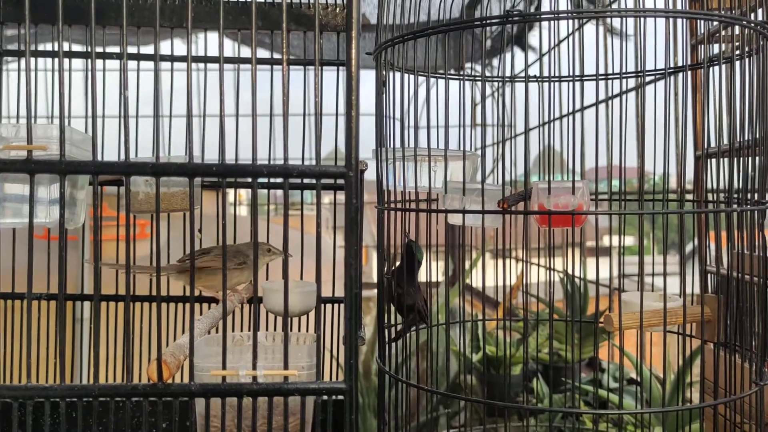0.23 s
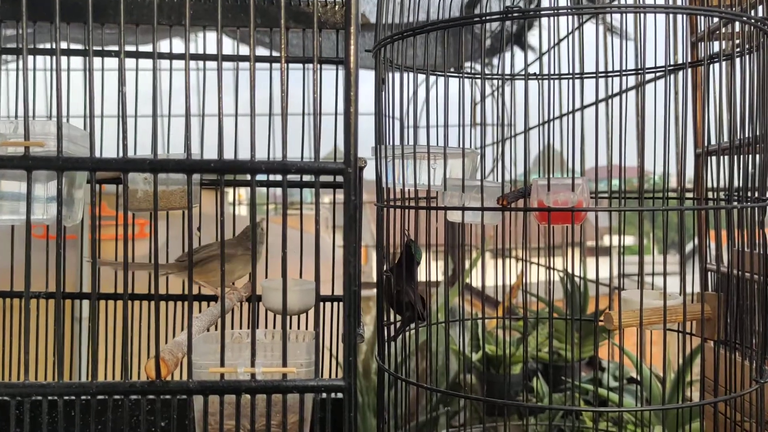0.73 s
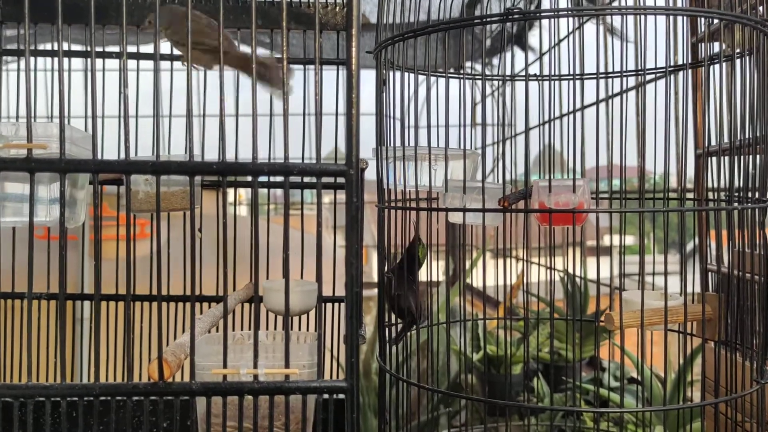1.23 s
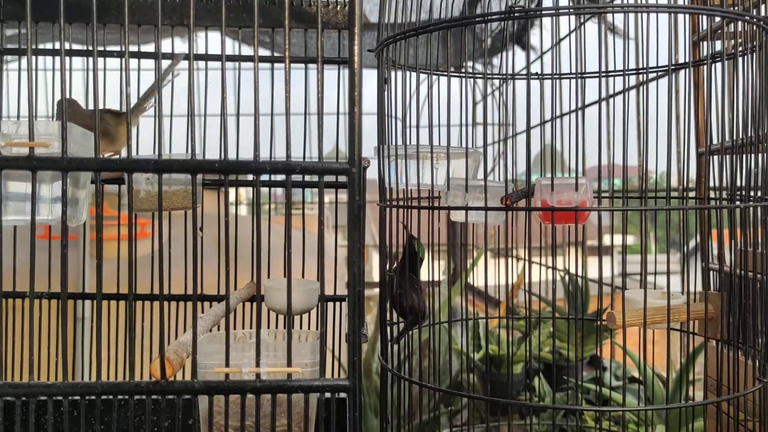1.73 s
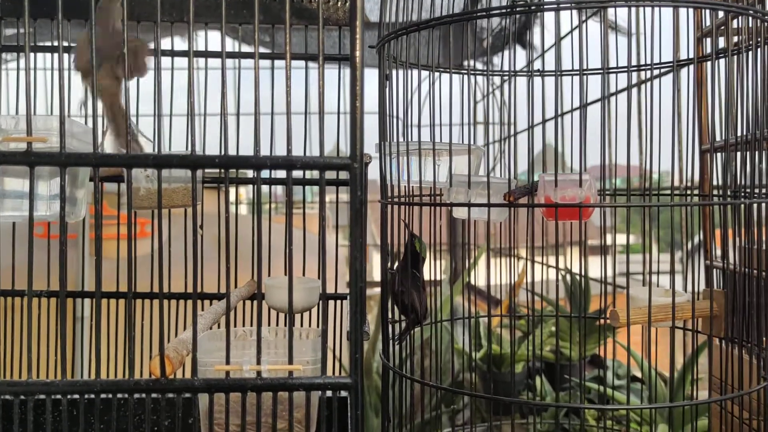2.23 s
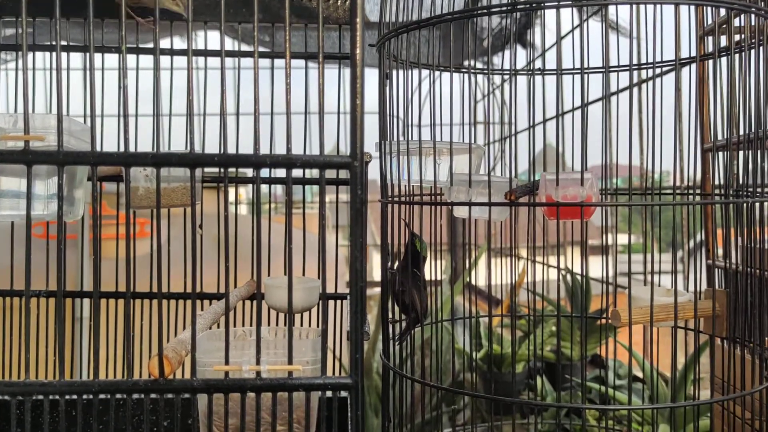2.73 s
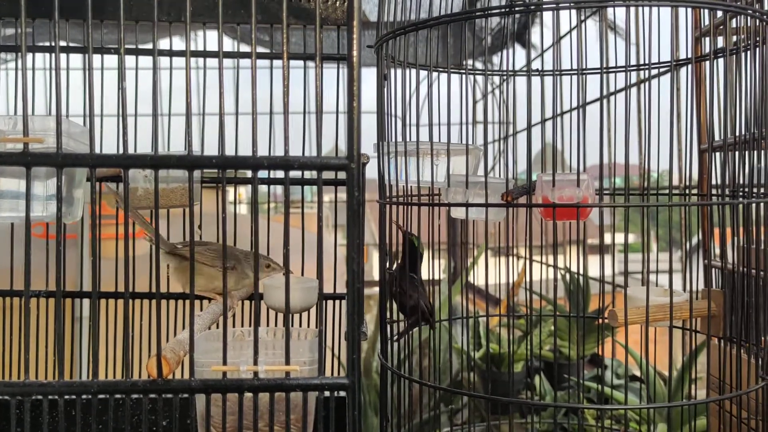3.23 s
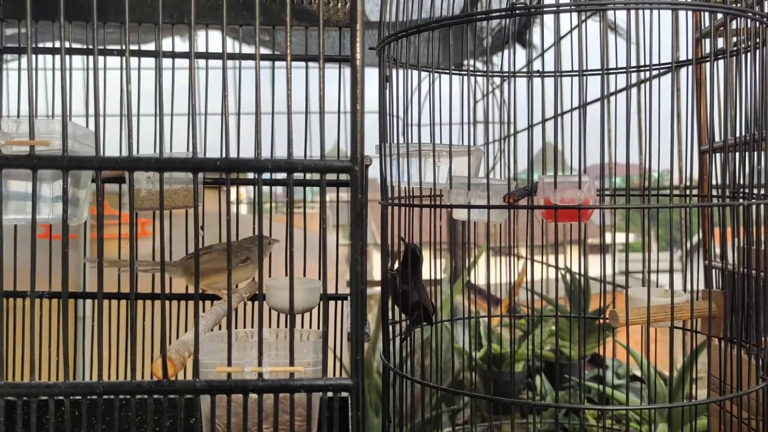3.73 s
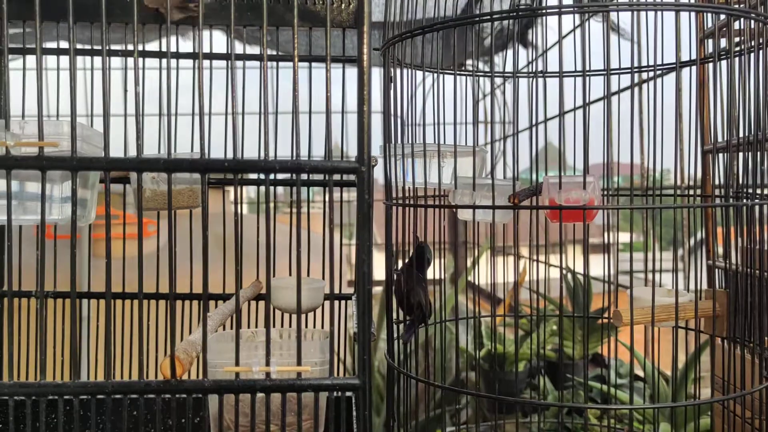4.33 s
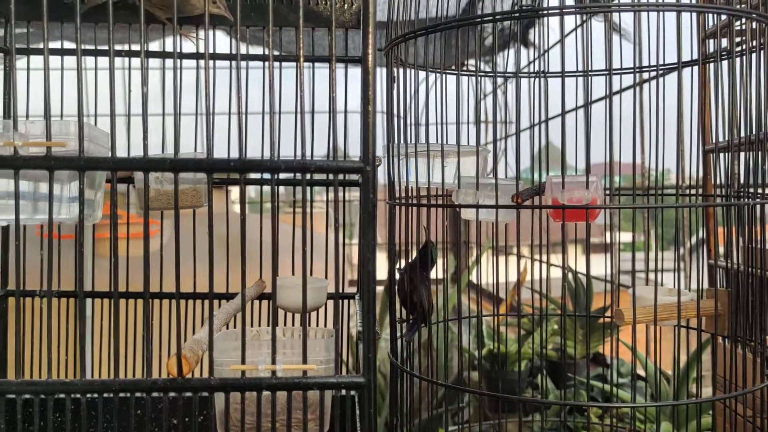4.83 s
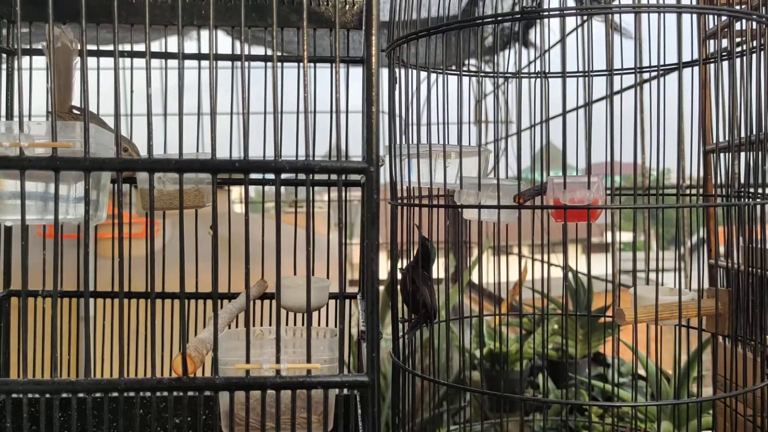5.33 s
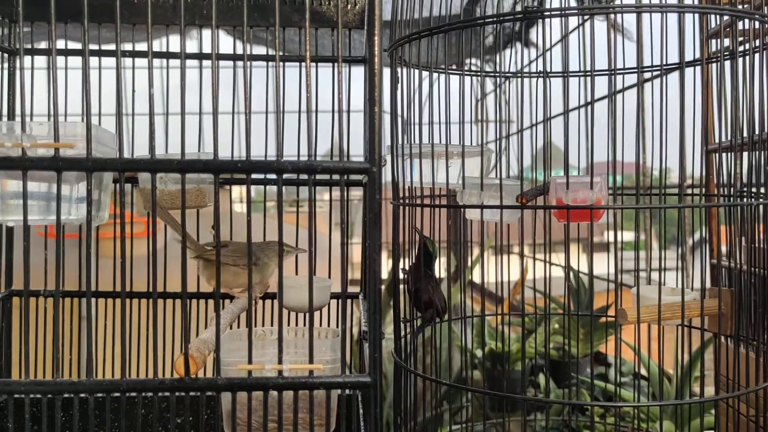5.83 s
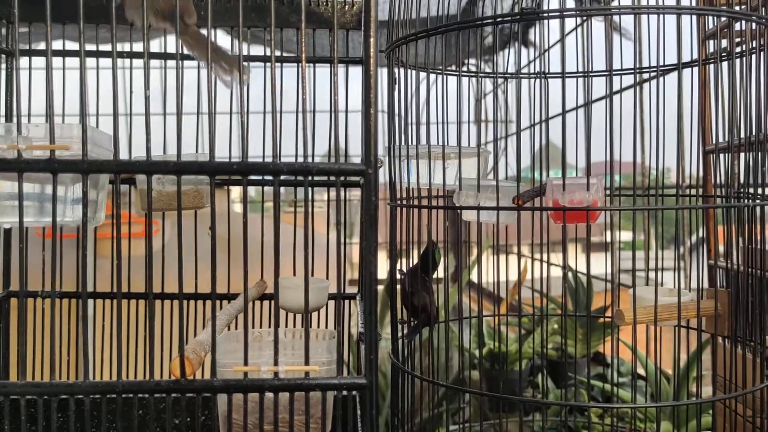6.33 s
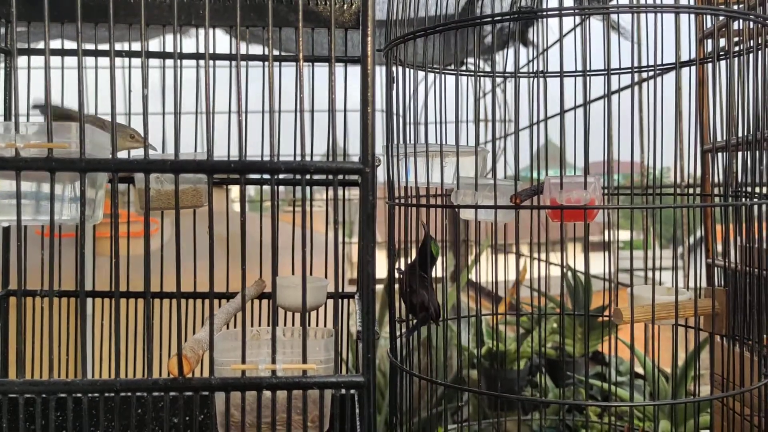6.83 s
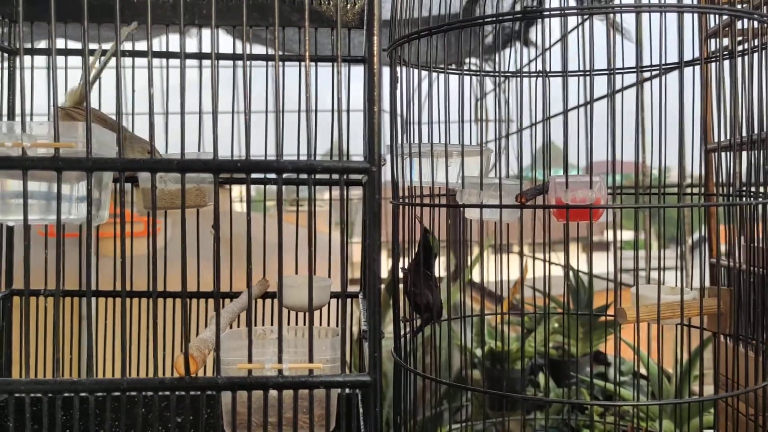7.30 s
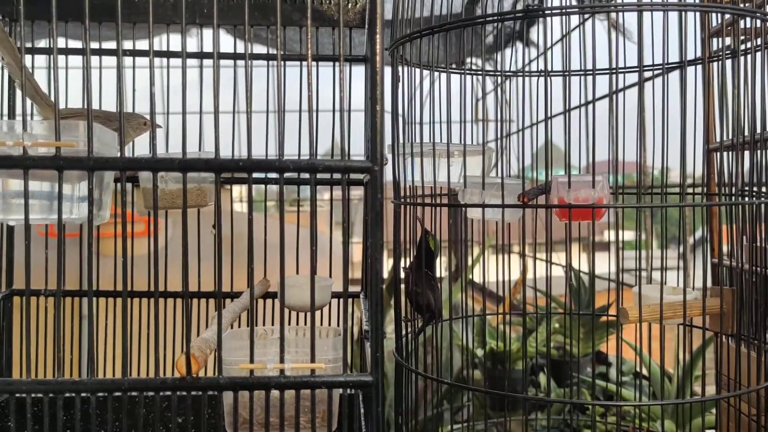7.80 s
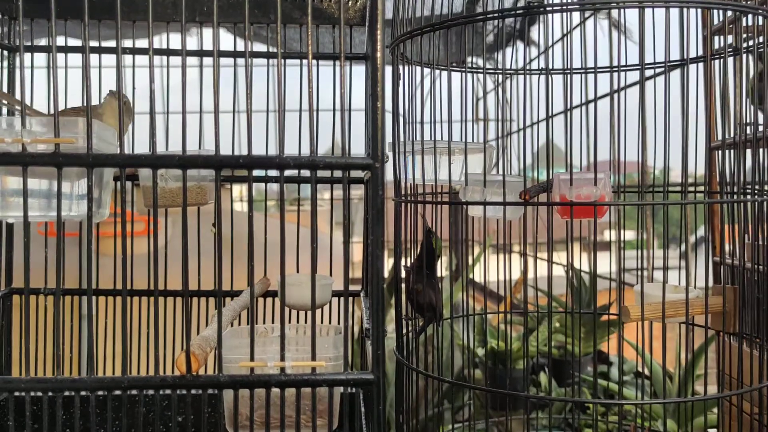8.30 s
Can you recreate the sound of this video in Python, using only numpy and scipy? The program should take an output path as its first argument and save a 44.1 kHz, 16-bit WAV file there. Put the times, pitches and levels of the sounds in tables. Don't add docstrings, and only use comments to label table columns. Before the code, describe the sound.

Sharp falling chips, buzzy rapid chirps, rough chacks and arched whistles from caged birds hopping on bars, with soft town rumble behind.

```python
import sys
import numpy as np
from scipy import signal
from scipy.fft import rfft, irfft
from scipy.io import wavfile
from scipy.ndimage import uniform_filter1d

SR = 44100
rng = np.random.default_rng(int(sys.argv[2]) if len(sys.argv) > 2 else 0)


def amplitude_ratio(level_db):
    exponent = np.asarray(level_db, float) / 20
    return 10 ** exponent


def to_wav(s):
    ch = np.atleast_2d(s).T
    pcm = np.round(np.clip(ch, -1, 1) * 32767)
    wavfile.write(sys.argv[1], SR, pcm.astype(np.int16))


N = 377496

# frequency_hz, density_db
HUM_SPECTRUM = [(15, -37), (25, -3), (55, 2), (84, -3.5), (212, -8), (439, -20.5), (659, -19.5),
                (1370, -34.5), (2760, -29.5), (4030, -33), (4740, -21.5), (7920, -44.5), (10100, -49.5),
                (14000, -38.5), (16000, -51.5)]
# time_s, level_db
MOTOR_LEVEL = [(0.0, -54.5), (0.71, -51), (1.02, -50), (1.55, -48.5), (2.2, -57.5), (5.6, -58),
               (6.32, -54.5), (8.56, -56.5)]
# frequency_hz, density_db
FEATHER_SPECTRUM = [(590, -60), (1000, -22), (2330, -10.5), (2650, -4.5), (3460, -7.5), (4730, 0),
                    (5310, -2), (10400, -15), (14100, 3), (15100, -4.5), (16000, -26)]
# start_s, length_s, level_db, change_db
FLURRIES = [(0.0, 0.078, -58, 6.5), (0.204, 0.14, -55, 5.5), (1.303, 0.15, -68, 0),
            (1.503, 0.027, -62, -12), (1.83, 0.38, -66, -11), (2.185, 0.22, -56, -16),
            (2.423, 0.38, -69.5, 11.5), (2.97, 0.17, -55, 2), (3.315, 0.27, -51.5, -12),
            (4.028, 0.3, -53.5, 0), (4.49, 0.096, -58.5, -7), (4.857, 0.27, -59, -6.5),
            (5.42, 0.16, -69.5, 14.5), (5.622, 0.079, -67, -3), (5.868, .1, -76, 14), (6.29, 0.09, -65, 11),
            (6.45, 0.56, -72.5, 15), (7.491, 0.33, -55.5, -10.5), (8.079, 0.21, -52, -3.5),
            (8.452, .04, -83, -0.5)]
# frequency_hz, level_db, t60_s
BAR_MODES = [(1692, -5.5, 0.049), (3126, -10, 0.11), (4660, 1, 0.034), (5910, 9.5, 0.028),
             (7340, -37, 0.015), (9230, -0.5, 0.013), (12930, 10.5, 0.011), (13100, 3, 0.012)]
# time_s, peak_db, middle_against_treble_db
LANDINGS = [(.072, -47.5, 21), (.313, -44, 21), (1.495, -26, 7), (1.734, -38, 5), (1.8317, -31.5, 5.5),
            (1.8447, -27, -1), (1.8961, -31, -21), (2.2130, -33, -10), (2.2450, -41, -12),
            (2.2827, -34, -1), (2.329, -36, -2), (2.367, -31, 5.5), (2.3995, -36, 9.5), (3.0495, -32, -5),
            (3.0956, -28.5, 9.5), (4.4932, -40, 9), (4.525, -29.5, 4.5), (4.5386, -29.5, 2),
            (4.6339, -34, -2), (4.6813, -55, 19.5), (4.719, -52, 16), (4.906, -35, 6), (5.041, -29.5, 4.5),
            (5.5897, -27, 1), (5.7274, -36, 4), (7.0008, -38.5, 6), (7.105, -34, -2), (8.079, -40, 4.5),
            (8.112, -40, 6), (8.1535, -31.5, 7.5), (8.183, -31, 8.5), (8.1945, -29, 8), (8.21, -36, 6.5),
            (8.254, -33, -9)]
# time_s, peak_db
GRIPS = [(.078, -41), (1.056, -35.5), (2.6836, -38), (2.738, -37), (2.968, -40), (5.5667, -57),
         (5.687, -36), (5.885, -41), (6.7126, -42), (6.7391, -43), (8.0994, -38), (8.469, -45.5)]

# frequency_hz, coherence_0_to_1
PORT_COHERENCE = [(60, 1), (130, .95), (290, 0.78), (600, 0.35), (1400, 0.4), (3100, 0.4), (6800, 0.3),
                  (15000, 0.3)]
# frequency_hz, level_db
LEFT_LEVEL = [(200, -0.5), (1300, 0.2), (2400, 0.5), (3800, -4), (4700, -8), (5600, -9), (7000, -5),
              (9000, -2.5), (14000, -13)]
# frequency_hz, lead_rad
LEFT_LEAD = [(60, -0.1), (200, -0.4), (430, -0.9), (1300, -3), (2500, -5.5), (4400, -6), (5400, -8),
             (6500, -7.5), (7500, -8), (10000, -7.5), (15000, -12)]
# frequency_hz, width_hz, gain_db
RIGHT_PORT_MODES = [(4850, 840, 7), (13800, 2100, 9.5)]
# delay_ms, left_db, right_db
EARLY_ECHOES = [(.9, -42.5, -35), (2.3, -32, -4), (4.1, -14.5, -15), (6.6, -8.5, -13.5),
                (13.5, -12.5, -15.5), (19, -17.5, -27)]
# frequency_hz, t60_s
TERRACE_DECAY = [(1000, 0.21), (4000, .11), (8000, 0.11), (15000, 0.16)]
# frequency_hz, threshold_db
MASKING_THRESHOLD = [(800, -90), (1100, -41), (1650, -43), (2300, -56), (7000, -54), (8400, -41),
                     (11300, -43), (12200, -75), (16000, -75)]

# start_s, end_s, first_hz, last_hz, level_db
BUZZES = [
    (4.028, 4.226, 6860, 6420, -43.5),
    (4.213, 4.441, 6380, 6194, -46.5),
]
# start_s, end_s, first_hz, last_hz, level_db
WHISTLES = [(.415, .50, 2830, 2770, -54.5), (.49, .60, 2790, 2800, -47.5), (.60, .72, 2580, 2430, -56),
            (4.30, 4.41, 2990, 2880, -41.5), (4.39, 4.53, 2740, 2625, -44.5),
            (4.675, 4.73, 2890, 2850, -59.5), (4.755, 4.80, 2610, 2780, -51.5),
            (4.77, 4.83, 3030, 2890, -54), (4.855, 4.915, 2868, 2796, -45), (4.94, 5.08, 2684, 2616, -47),
            (7.215, 7.34, 2940, 2933, -47.5), (7.36, 7.5, 2970, 2900, -64)]
# start_s, end_s, first_hz, last_hz, level_db
FAINT_WHISTLES = [(1.38, 1.44, 4730, 4750, -57.5), (2.525, 2.595, 4450, 4190, -56.5),
                  (2.62, 2.675, 3700, 4300, -60), (2.675, 2.71, 4150, 4100, -60), (2.855, 2.94, 4300, 4060, -61),
                  (2.82, 2.94, 5600, 5500, -69), (4.82, 4.86, 5150, 5220, -62),
                  (4.96, 5.09, 7100, 6950, -55), (5.117, 5.218, 6560, 6430, -54), (5.281, 5.434, 8480, 7540, -62),
         (5.801, 5.888, 6800, 7050, -65), (0.071, 0.085, 1440, 1370, -51), (4.537, 4.62, 784, 823, -60.5),
         (4.645, 4.68, 1990, 1950, -63), (5.5, 5.526, 6380, 5300, -56.5)]

# time_ms, level_db, pitch_hz
ARCH = [(-2, -27.5, 6900), (1, -16, 4600), (9, -3, 6800), (17.5, -2.5, 7250), (34.5, -6.5, 7950),
        (53, -5, 8100), (65.5, 5, 6600), (76, -3.5, 5405), (79, -46, 4330)]
POINTED_ARCH = [(-1.5, -14, 4900), (3.5, -9, 5500), (13, 2, 6800), (46.5, -8, 8370), (58.5, 8.5, 6800),
                (72.5, -2.5, 5010), (75, -38, 3900)]
SLUR = [(-3, -30, 5700), (0, -5, 5600), (9, -9, 5000), (16.5, 4, 4750), (23, -10, 4650), (45.5, -9, 4700),
        (61.5, -20, 2800), (69, -36, 4700)]
CHIP = [(-5.5, -34, 5600), (0.5, -8, 5800), (6, -4.5, 5550), (12, 2.5, 5000), (19, 0.5, 4400),
        (22, -7, 3400), (30.5, -9.5, 2500), (34, -26, 1150)]
FAR_CHIP = [(-6, -25, 5600), (2, 0, 5700), (6.5, -3.5, 5400), (14.5, 2.5, 4900), (18.5, -1, 4400),
            (25, -14, 3300), (25, -30, 3000)]
# time_ms, level_db, low_pitch_hz, high_pitch_hz
CHIRP = [(-8, -15, 2800, 4700), (3, -9, 3200, 4800), (10, -0.5, 3950, 5750), (16, -0.5, 4080, 5850),
         (24.5, -2.5, 3800, 5800), (36, 2, 3400, 5450), (45.5, 1, 3050, 4800), (54, 2.5, 2634, 4350),
         (61, -11, 2200, 4500)]
# attack_ms, hold_ms, release_ms, sag_db, first_hz, top_hz, rest_hz, sink_ms
CHACK = (16, 32.5, 34.5, -3.5, 1153.5, 1599, 559, 31.5)
TIK = (2.25, 9.3, 1.8, 1.5, 3700, 4160, 2250, 9.8)
SQUAWK = (6.5, 30.5, 24, -14, 864, 904.5, 638, 53)

# frequency_hz, gain_db
CHACK_THROAT = [(1500, -27), (2500, -25), (3100, -5.5), (4500, -1.5), (5600, -5), (6500, -13.5),
                (7500, -37.5)]
SQUAWK_THROAT = [(800, -48), (1500, 1.5), (2200, -7.5), (3000, -10), (3700, -6), (4500, -14), (6000, -30)]
CHIRP_THROAT = [(1500, -47), (2800, -6.5), (4000, -3.5), (5500, -1), (7000, 1.5), (8300, -20.5),
                (11000, -33)]
BEAK_HISS = [(2000, -28.5), (3000, -8), (7000, -8.5), (8500, -3), (12000, -7.5), (15000, -15.5),
             (16000, -15)]

# start_s, level_db, pitch_ratio, length_ratio
FAR_CHIPS = [(3.165, -51, 0.96, 0.56), (3.838, -52.5, 0.86, 0.66), (3.885, -49.5, 0.924, 1.3),
             (3.034, -33, 0.99, .55), (2.13, -43, 1.07, .45), (2.196, -46, 1.2, 0.4),
             (3.25, -66, 1.16, 1.05)]
TIKS = [(2.125, -41.5, 1, 0.83), (2.96, -44.5, 1.043, 1.1), (3.644, -41, 1.1, .9), (3.650, -46, 1.6, 1.1)]
SQUAWKS = [
    (6.63, -47.5, .84, .6),
    (6.648, -39, 1.01, 0.84),
]
CHACKS = [(.553, -40, 1.04, 1), (1.533, -39.5, 0.87, 0.89), (2.771, -37.5, 0.96, 0.95),
          (3.519, -38.5, 1.16, 0.86), (4.222, -36.5, 1.02, 0.93), (4.902, -38.5, 1.02, 0.98),
          (5.418, -40.5, 1.02, 1), (6.477, -41, 0.97, 0.99), (7.33, -40.5, 0.93, 1)]
CHIRPS = [(0.461, -30.5, 1.034, 0.83), (0.587, -31, 1.01, 0.86), (0.719, -31, 1.045, 0.81),
          (0.847, -31.5, 1.03, 0.81), (0.968, -32, 1.06, 0.83), (1.098, -30, 1.056, 0.84),
          (1.228, -30.5, 1.054, 0.84), (3.45, -33, 1.03, 0.8), (3.578, -31, 1.06, 0.81),
          (3.704, -32, 1.03, 0.82), (5.957, -34, 1.02, 0.84), (6.078, -33, 1.08, 0.84),
          (6.207, -32, 1.065, 0.77), (7.246, -31.5, 1.074, 0.75)]
CHIPS = [
    (.207, -29, 1.016, 0.86),
    (0.326, -24, 1.006, 0.74),
    (3.004, -35.5, 1.016, 1.02),
    (3.314, -29.5, .99, .88),
]
SHORT_CHIPS = [
    (3.695, -30.5, 0.94, 1.3),
    (2.172, -39.5, 0.83, 0.96),
]
SLURS = [
    (2.166, -32, 0.97, 0.97),
]
POINTED_ARCHES = [
    (6.342, -28.5, 0.99, 1.025),
]
ARCHES = [
    (4.117, -22.5, 0.99, 0.89),
    (7.486, -25.5, 0.99, 0.94),
    (7.759, -25.5, 1.01, 0.98),
    (8.112, -25.5, 0.99, 0.94),
]


def evened(x):
    return x / np.sqrt(np.mean(abs(x) ** 2) + 1e-20)


def read(points, hz):
    f, value = np.transpose(points)
    return np.interp(np.log(hz + 1), np.log(f + 1), value)


def add(mix, s, sound):
    part = mix[round(s * SR):][:len(sound)]
    part += sound[:len(part)]


def wobble(count, span):
    span = max(int(span), 2)
    once = uniform_filter1d(rng.standard_normal(count), span)
    return evened(uniform_filter1d(once, span))


def tone(hz, rough, span=63.0):
    tremble = 1 + rough * (wobble(len(hz), span) + 1j * wobble(len(hz), span))
    carrier = np.exp(2j * np.pi * np.cumsum(hz) / SR)
    return np.sqrt(2) * (tremble * carrier).real


def coloured(x, spectrum):
    hz = np.fft.rfftfreq(len(x), 1 / SR)
    return irfft(rfft(x) * amplitude_ratio(read(spectrum, hz)), len(x))


def left_port(hz):
    return amplitude_ratio(read(LEFT_LEVEL, hz)) * np.exp(1j * read(LEFT_LEAD, hz))


def through_ports(air):
    hz = np.fft.rfftfreq(N, 1 / SR)
    right = 1
    for f, width_hz, db in RIGHT_PORT_MODES:
        right = right + (amplitude_ratio(db) - 1) / (1 + 1j * (hz ** 2 - f ** 2) / (hz * width_hz + 1))
    return irfft(rfft(air) * right * np.array([left_port(hz), np.ones(len(hz))]), N)


def early(x):
    taps = np.zeros((2, SR // 40))
    taps[:, 0] = 1
    for k, (ms, left_db, right_db) in enumerate(EARLY_ECHOES):
        taps[:, round(ms * SR / 1000)] = (-1) ** k * amplitude_ratio(np.array([left_db, right_db]))
    return signal.oaconvolve(x[None], taps, axes=1)[:, :N]


def terrace(x, first_ms):
    taps = np.zeros((2, SR // 2))
    at = np.arange(int(first_ms * SR / 1000), SR // 2 - 20, 20)
    at = at + rng.integers(0, 20, (2, len(at)))
    np.put_along_axis(taps, at, rng.choice([-1., 1.], at.shape), 1)
    hz, t, z = signal.stft(taps, SR, nperseg=128)
    decay = amplitude_ratio(-60 * t / read(TERRACE_DECAY, hz)[:, None])
    tail = signal.istft(z * decay, SR, nperseg=128)[1]
    tail = np.array([0.28 * tail[1] + 1.24 * tail[0], tail[1]])
    tail = tail / np.linalg.norm(tail, axis=1)[:, None]
    return signal.fftconvolve(x[None], tail, axes=1)[:, :N]


def diffuse(spectrum, patchy_db, swell_db, size):
    frames, hz = 4 * N // size + 5, np.fft.rfftfreq(size, 1 / SR)
    a, b, c, d, patches = rng.standard_normal((frames, len(hz), 5)).T
    patches = uniform_filter1d(patches, size=12, axis=0)
    patches = evened(uniform_filter1d(patches, size=10, axis=1))
    same = np.clip(read(PORT_COHERENCE, hz), 0, 1)[:, None]
    right = a + 1j * b
    left = left_port(hz)[:, None] * (same * right + np.sqrt(1 - same ** 2) * (c + 1j * d))
    level_db = read(spectrum, hz)[:, None] + patchy_db * patches + swell_db * wobble(frames, 3.6)
    z = np.array([left, right]) * amplitude_ratio(level_db)
    return evened(signal.istft(z, nperseg=size, noverlap=size * 3 // 4)[1][:, :N])


def hum():
    return amplitude_ratio(-48) * diffuse(HUM_SPECTRUM, patchy_db=0.98, swell_db=0.62, size=1024)


def motor():
    s, db = np.transpose(MOTOR_LEVEL)
    level = amplitude_ratio(np.interp(np.arange(N) / SR, s, db) - 3.0)
    return level * tone(75.7 * (1 + 0.0802 * wobble(N, 8920)), 0.54, 1380.0)


def rustle():
    rise_db_per_s, fall_db_per_s = 1100, 335
    beat_hz, beat_depth_db = 28, 0.5
    t, gain = np.arange(0, N, 32) / SR, 0
    for start, length, db, change_db in FLURRIES:
        late = t - start
        rise_db = rise_db_per_s * np.minimum(late, 0)
        fall_db = fall_db_per_s * np.maximum(late - length, 0)
        beat_db = beat_depth_db * np.sin(2 * np.pi * beat_hz * late)
        drift_db = change_db * np.clip(late / length, 0, 1)
        gain = np.maximum(gain, amplitude_ratio(db + drift_db + rise_db - fall_db + beat_db))
    hiss = diffuse(FEATHER_SPECTRUM, patchy_db=3.5, swell_db=2.5, size=256)
    return amplitude_ratio(4.5) * np.interp(np.arange(N) / SR, t, gain) * hiss


def feet():
    rise_s, crack_t60_s, scrape_t60_s = 0.001, 0.0075, 0.046
    ring_db, scrape_db, grip_middle_db = -16, -10.5, 1.5
    out, t = np.zeros(N), np.arange(1500) / SR
    rows = LANDINGS + [(s, db, grip_middle_db) for s, db in GRIPS]
    detunes = rng.uniform(0.8, 1.1, (len(rows), len(BAR_MODES)))
    noise_decay = amplitude_ratio(3.0 - 60 * t / crack_t60_s) + amplitude_ratio(scrape_db - 60 * t / scrape_t60_s)
    for (s, db, middle_db), detune in zip(rows, detunes):
        rings = 0
        for (f, mode_db, t60), k in zip(BAR_MODES, detune):
            decay = amplitude_ratio(mode_db - 60 * t / t60 + middle_db * (f < 7200))
            rings = rings + decay * np.sin(2 * np.pi * f * k * t)
        spectrum = [(1200, middle_db - 22), (3000, middle_db - 9.0), (7000, middle_db),
                    (8500, 0.007), (15000, 0)]
        scrape = coloured(rng.standard_normal(len(t)), spectrum)
        attack = np.minimum(t / rise_s, 1)
        add(out, s - rise_s / 2, amplitude_ratio(db - 7.0) * attack * (amplitude_ratio(ring_db) * rings + scrape * noise_decay))
    return out


def insect():
    out = np.zeros(N)
    for start, end, first_hz, last_hz, db in BUZZES:
        t = np.arange(0, end - start, 1 / SR)
        hz = first_hz + (last_hz - first_hz) * t / t[-1]
        stroke_hz = 105 * (1 + 0.38 * wobble(len(t), 300))
        throb = 1 + 0.76 * np.cos(2 * np.pi * np.cumsum(stroke_hz) / SR)
        body = tone(hz, 1.0, 41.0)
        body += amplitude_ratio(-6.5) * tone(2 * hz, 1.18, 12.)
        body += amplitude_ratio(-8) * tone(0.84 * hz, 1.76, 23.0)
        level = np.minimum(t / 0.011, 1) * amplitude_ratio(db - 21 * t / t[-1])
        add(out, start, level * throb * body)
    return out


def far_whistles(rows, rough, waver, fade_db):
    out = np.zeros(N)
    for start, end, first_hz, last_hz, db in rows:
        u = np.linspace(0, 1, round((end - start) * SR))
        hz = (first_hz + (last_hz - first_hz) * u) * (1 + waver * wobble(len(u), 230))
        ends = np.minimum(np.minimum(u / 0.16, (1 - u) / 0.34), 1)
        level = amplitude_ratio(db + fade_db * u + 3.6 * wobble(len(u), 620))
        add(out, start, ends * level * tone(hz, rough, 80.0))
    return out


def glide(attack_ms, hold_ms, release_ms, sag_db, first_hz, top_hz, rest_hz, sink_ms):
    silent_db = -23
    ms = np.linspace(0, hold_ms + release_ms, 12)
    level_db = np.interp(ms, [0, hold_ms, ms[-1]], [0, sag_db, silent_db])
    hz = rest_hz + (top_hz - rest_hz) * np.exp(-ms / sink_ms)
    return [(-attack_ms / 2, silent_db, first_hz)] + list(zip(ms + attack_ms / 2, level_db, hz))


def sing(shape, notes, voice):
    soft_start_ms = 5
    out = np.zeros(N)
    ms, level_db, *pitches = np.transpose(shape)
    for s, db, higher, longer in notes:
        t = np.arange(ms[0], ms[-1], 1000 / SR / longer)
        smooth = [uniform_filter1d(higher * np.interp(t, ms, p), size=45) for p in pitches]
        level = np.minimum((t - ms[0]) / soft_start_ms, 1) * amplitude_ratio(db + np.interp(t, ms, level_db))
        add(out, s + ms[0] * longer / 1000, level * voice(*smooth))
    return out


def rasp(throat, rough, hiss_db, closing):
    def voice(hz):
        breath = evened(coloured(rng.standard_normal(len(hz)), throat))
        shut = (hz.max() / hz) ** closing
        hz = hz * (1 + .022 * wobble(len(hz), 160))
        harmonics = sum(amplitude_ratio(read(throat, k * hz * shut)) * tone(k * hz, rough, 34.8)
                        for k in range(1, 11))
        return harmonics + amplitude_ratio(hiss_db) * breath / shut ** 2
    return voice


def whistle(hz, octave_db=-41, rough=0.189):
    return tone(hz, rough) + amplitude_ratio(octave_db) * tone(np.minimum(2 * hz, 16000), 0.93)


def two_voices(low, high):
    high = high * (1 + .014 * rng.standard_normal() + .006 * wobble(len(high), 300))
    # pitch_hz, level_db, roughness
    lines = [(low, -1, .2), (high, 0, .26), (2 * low, -4, .25), (high + low, -6, .4), (high - low, -6, .5),
             (2 * high, 3, .3), (2 * low + high, 3, .4), (2 * high - low, -9, .4)]
    hiss = evened(coloured(rng.standard_normal(len(low)), BEAK_HISS))
    voiced = sum(amplitude_ratio(db + read(CHIRP_THROAT, hz)) * tone(hz, rough, 42.0) for hz, db, rough in lines)
    return voiced + amplitude_ratio(-10.5) * hiss


def far_sources():
    far = sing(glide(*SQUAWK), SQUAWKS, rasp(SQUAWK_THROAT, 0.13, -3.5, closing=.1))
    far += sing(FAR_CHIP, FAR_CHIPS, whistle)
    far += sing(glide(*TIK), TIKS, lambda hz: whistle(hz, octave_db=-29))
    far += insect()
    far += far_whistles(WHISTLES, rough=0.34, waver=0.016, fade_db=-9)
    far += far_whistles(FAINT_WHISTLES, rough=0.41, waver=0.007, fade_db=-10.5)
    return far


def near_birds():
    near = sing(ARCH, ARCHES, whistle)
    near += sing(POINTED_ARCH, POINTED_ARCHES, whistle)
    near += sing(SLUR, SLURS, whistle)
    near += sing(FAR_CHIP, SHORT_CHIPS, whistle)
    near += sing(CHIP, CHIPS, whistle)
    near += sing(CHIRP, CHIRPS, two_voices)
    near += sing(glide(*CHACK), CHACKS, rasp(CHACK_THROAT, .25, -8, closing=0.26))
    return near


def scene():
    near, far, steps = near_birds(), far_sources(), feet()
    air = early(near + amplitude_ratio(-1.0) * far + steps)
    air = air + terrace(amplitude_ratio(-4.5) * near + amplitude_ratio(-6.0) * steps, first_ms=1.392)
    air = air + amplitude_ratio(2.0) * terrace(far, first_ms=2.5)
    return through_ports(air) + rustle() + motor() + hum()


def unmasked(x):
    lingers = .72
    hz, t, z = signal.stft(x, SR, nperseg=1024)
    bands = (abs(z[:, :512]) ** 2).mean(0).reshape(64, 8, -1).mean(1)
    now = bands[3:].max(0)
    loudest = np.maximum(signal.lfilter([1 - lingers], [1, -lingers], now), now)
    keep = bands > loudest * amplitude_ratio(read(MASKING_THRESHOLD, hz[4:512:8]))[:, None] ** 2
    keep = np.vstack([np.repeat(keep, 8, 0), keep[-1:]])
    return signal.istft(z * keep, SR, nperseg=1024)[1][:, :N]


def top_cut(x):
    return signal.sosfilt(signal.butter(12, 16480, fs=SR, output="sos"), x)


def record(dry):
    cut = signal.sosfilt(signal.butter(3, 41, "high", fs=SR, output="sos"), dry)
    limited = signal.oaconvolve(cut, signal.firwin(301, 15750, fs=SR)[None], "same", axes=1)
    finished = unmasked(limited)
    return top_cut(finished)


dry = scene()
out = record(dry)
to_wav(out)
```